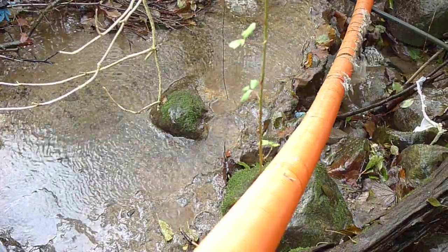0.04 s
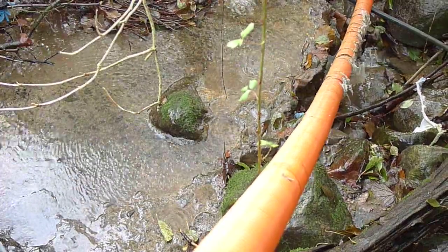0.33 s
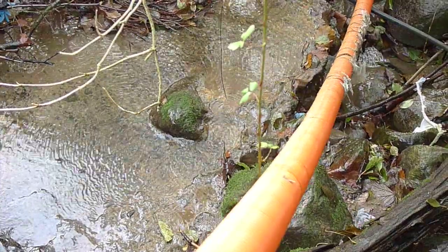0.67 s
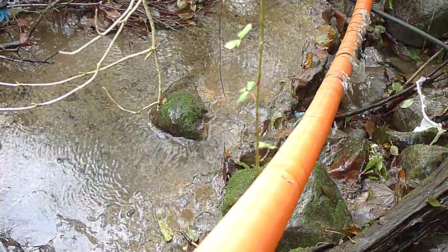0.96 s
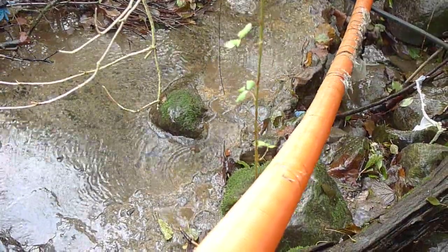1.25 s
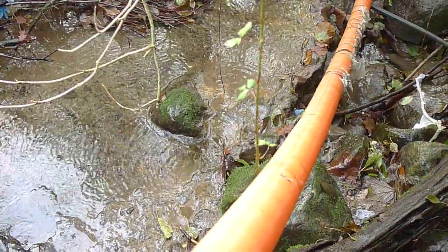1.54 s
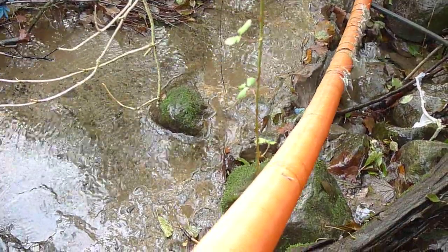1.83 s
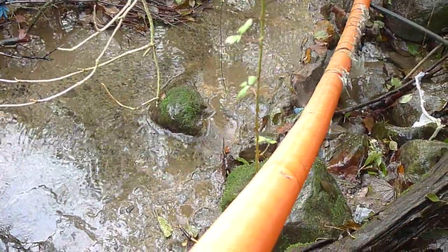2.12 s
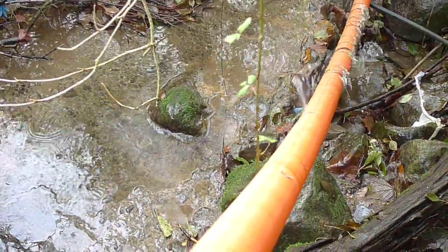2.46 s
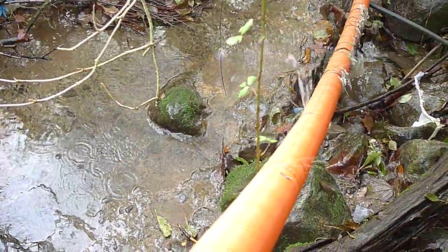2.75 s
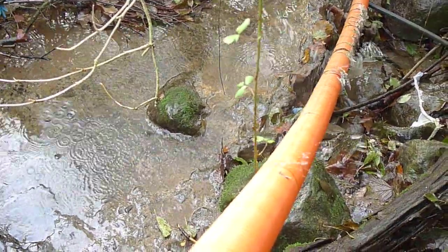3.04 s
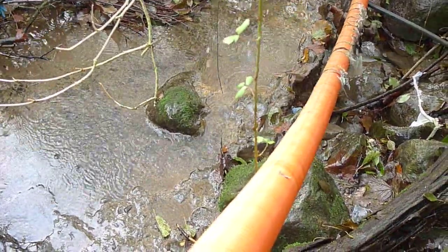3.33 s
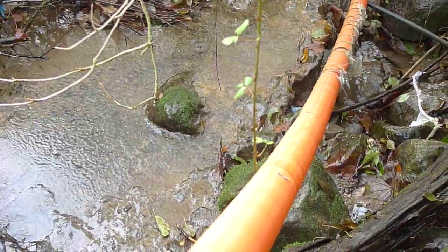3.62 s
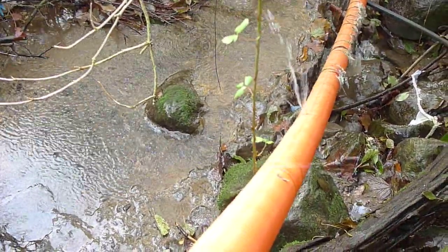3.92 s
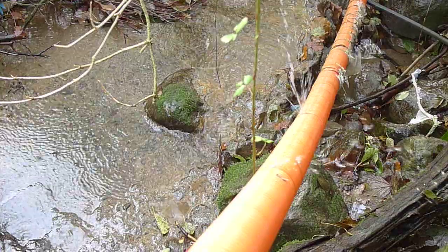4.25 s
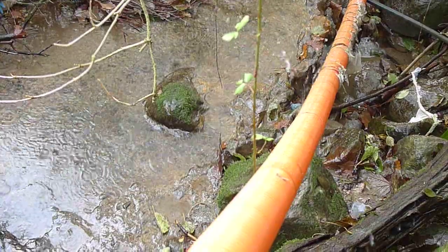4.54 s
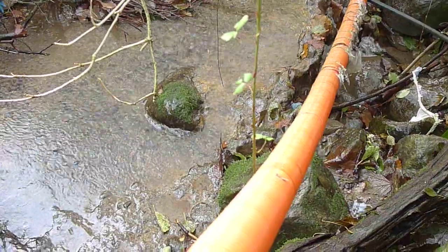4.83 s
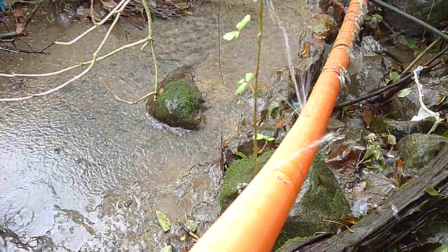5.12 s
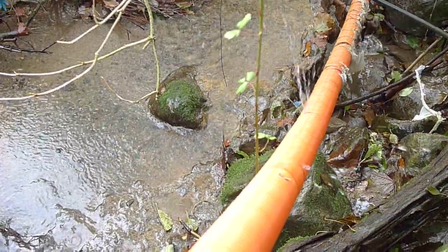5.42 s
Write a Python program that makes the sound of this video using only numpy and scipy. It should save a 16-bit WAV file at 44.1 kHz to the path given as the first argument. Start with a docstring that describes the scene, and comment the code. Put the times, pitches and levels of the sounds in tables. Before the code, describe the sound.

Air and water squeak and hiss in short spurts from a cracked hose, while spray patters and drops plink into a shallow running stream.

```python
"""A leaking hose above a shallow stream, heard close by through a small, dull microphone.
The stream runs and gurgles throughout, and spray patters on it. In the first second, air forced through
the wet crack whistles on a falling pitch and squeaks; drops begin to plink. The whistle ends in a faint
spurt. From about 2 s, air and water sputter out together in shrill spurts among gushes of spray.
Near 5 s the spurts die out and drops smack on stone and leaves."""
import sys
import numpy as np
from scipy import signal
from scipy.fft import rfft, irfft
from scipy.io import wavfile

SR = 44100
rng = np.random.default_rng(int(sys.argv[2]) if len(sys.argv) > 2 else 0)


def bounce(signal):
    """Save signal as a 16-bit WAV file at the path given by the first command-line argument."""
    frames = np.transpose(np.atleast_2d(signal))
    limited = np.clip(frames, -1, 1)
    pcm = np.round(limited * 32767).astype(np.int16)
    wavfile.write(sys.argv[1], SR, pcm)


N = 250488
TIME = np.arange(N) / SR


def gain_of(db):
    """Decibels to amplitude."""
    return 10 ** (np.asarray(db) / 20)


def unit_rms(x):
    """Scales to rms 1."""
    return x / np.sqrt(np.mean(x ** 2) + 1e-20)


def coloured(x, spectrum):
    """Filters x by a (frequency [Hz], gain [dB]) curve; rms 1."""
    hz, db = np.transpose(spectrum)
    curve_db = np.interp(np.log(np.fft.rfftfreq(N, 1 / SR) + 1), np.log(hz), db)
    return unit_rms(irfft(rfft(x) * gain_of(curve_db), N))


def wander(rate_hz):
    """Smooth random motion up to about rate_hz; rms 1."""
    lowpass = np.exp(-.5 * (np.fft.rfftfreq(N, 1 / SR) / rate_hz) ** 2)
    return unit_rms(irfft(rfft(rng.standard_normal(N)) * lowpass, N))


def resonate(x, hz, width_hz, order=2):
    """Resonance at a steady or moving pitch, cascaded for steep skirts."""
    carrier = np.exp(2j * np.pi * np.cumsum(hz * np.ones(len(x))) / SR)
    pole = np.exp(-np.pi * width_hz / SR)
    baseband = x / carrier
    for _ in range(order):
        baseband = signal.lfilter([1 - pole], [1, -pole], baseband + 1e-18)
    return (carrier * baseband).real


def add(mix, start_s, sound):
    """Mixes a sound in at start_s."""
    part = mix[max(round(start_s * SR), 0):][:len(sound)]
    part += sound[:len(part)]


def burst(start_s, hold_s, db, attack_s, release_s, db_per_s=0):
    """Envelope: builds until start_s, holds on a dB slope, dies away."""
    t = TIME - start_s
    edges = np.minimum(t, 0) / attack_s - np.maximum(t - hold_s, 0) / release_s
    return gain_of(db + db_per_s * np.clip(t, 0, hold_s)) * np.exp(np.maximum(edges, -20))


def impacts(per_s, spread_db):
    """Random clicks, mostly small, a few large."""
    size = gain_of(spread_db * np.minimum(rng.exponential(1, N), 4))
    return size * rng.choice([-1, 1], N) * (rng.random(N) < per_s / SR)


def bubble(hz, rise_cycles, ring_cycles, glide):
    """A trapped bubble swells, rings down and rises in pitch as it nears the surface."""
    cycles = hz * np.arange(SR // 16) / SR
    envelope = (1 - np.exp(-(cycles / rise_cycles) ** 2)) * np.exp(-cycles / ring_cycles)
    return envelope / envelope.max() * np.sin(2 * np.pi * cycles * (1 + glide * cycles))


# Stream spectrum: (frequency [Hz], gain [dB])
STREAM_SPECTRUM = [(25, -29), (60, -11), (110, -6.5), (185, 0), (350, -3.5), (540, 0), (1050, -3.5),
                   (1700, -2.5), (2600, -6), (3500, -5.5), (4200, -17.5), (5000, -26.5), (6000, -37.5),
                   (9000, -66.5)]


def stream(level_db=-43.5, bubble_db=-3, splash_db=-8, swell_db=0.5):
    """Running water: a smooth wash, many small bubbles and tiny splashes."""
    bubbles = np.zeros(N)
    for hz in np.geomspace(350, 3800, 22):
        births = impacts(per_s=26, spread_db=4.5)
        ring = bubble(hz, rise_cycles=0.56, ring_cycles=6.7, glide=0.006)
        bubbles += unit_rms(signal.oaconvolve(births, ring)[:N]) * np.sqrt(hz)
    wash = rng.standard_normal(N)
    splashes = gain_of(splash_db) * unit_rms(impacts(per_s=350, spread_db=6))
    water = coloured(wash + splashes, STREAM_SPECTRUM)
    water += gain_of(bubble_db) * coloured(bubbles, STREAM_SPECTRUM)
    return gain_of(level_db + swell_db * wander(5.6)) * unit_rms(water)


# Spray spectrum: (frequency [Hz], gain [dB])
SPRAY_SPECTRUM = [(40, -37.5), (100, -23.5), (180, -4), (330, -8), (520, -2), (1100, -0.5), (2000, -1.5),
                  (3000, 1.5), (3700, -1), (4400, -10.5), (5100, -20.5), (6000, -27), (9000, -61)]
# Gushes of spray: (time [s], hold [s], level [dB])
SPRAY_GUSHES = [(0.03, 0.62, -50), (1.77, 0.42, -40), (2.297, .22, -42), (2.618, 0.26, -48),
                (2.996, 0.032, -37.5), (3.659, 0.12, -39.5), (3.819, 0.058, -35), (3.961, 0.08, -40),
                (4.495, 0.043, -45.5), (4.7, 0.26, -53.5), (4.995, 0.027, -42.5), (5.112, 0.028, -42),
                (5.393, 0.034, -55)]


def spray(drizzle_db=-52, mist_db=-3, clump_db=1.8, spit_db=-9):
    """Droplets and heavier spits land in clumps on water and leaves: gushes over a steady drizzle."""
    gushes = sum(burst(*row, attack_s=0.03, release_s=0.035) for row in SPRAY_GUSHES)
    flow = gain_of(drizzle_db) + gushes
    droplets = unit_rms(impacts(per_s=2600, spread_db=1)) + gain_of(mist_db) * rng.standard_normal(N)
    spit_decay = np.exp(-np.arange(SR // 100) / (0.00072 * SR))
    spits = signal.oaconvolve(impacts(per_s=90, spread_db=4), spit_decay)[:N] * rng.standard_normal(N)
    patter = coloured(droplets + gain_of(spit_db) * unit_rms(spits), SPRAY_SPECTRUM)
    return flow * gain_of(clump_db * wander(21)) * patter


# Low gurgles: (peak time [s], level [dB], centre [Hz], Gaussian sigma [s])
LOW_GURGLES = [(0.111, -39.5, 297, 0.024), (0.117, -42.5, 600, 0.039), (0.25, -43, 540, .018),
               (.27, -48, 240, 0.056), (0.424, -46, 230, 0.015), (0.659, -47, 290, 0.051),
               (1.756, -38, 474, .016), (2.473, -47.5, 508, 0.058), (3.637, -50, 220, .1),
               (3.786, -42.5, 620, .025), (3.96, -39.5, 620, 0.021), (5.556, -54.5, 190, .1)]


def gurgles():
    """Clusters of large bubbles, each a swell of low noise."""
    out = np.zeros(N)
    for peak_s, db, hz, sigma_s in LOW_GURGLES:
        envelope = gain_of(db) * np.exp(-.5 * ((TIME - peak_s) / sigma_s) ** 2)
        out += envelope * unit_rms(resonate(rng.standard_normal(N), hz, width_hz=0.8 * hz, order=3))
    return out


# First mode of the crack: (time [s], pitch [Hz])
CRACK_PITCH = [(.1, 1560), (.3, 1678), (.35, 1642), (.5, 1573), (.56, 1528), (.68, 1502), (.8, 1410),
               (.87, 1410), (1.06, 1326)]
# Jet locks into a tone: (time [s], hold [s], level [dB], attack [s], release [s])
JET_LOCKS = [(0.346, .058, -18, 0.0094, .008), (0.468, .14, -18.5, 0.014, 0.042),
             (0.775, 0.023, -23, 0.013, 0.013), (0.824, 0.036, -29, 0.013, 0.02)]
# Locked tone: (harmonic [number], level [dB])
LOCK_HARMONICS = [(1, 4.5), (2, -19.5), (3, -46)]


def whistle(first_s=.19, third_s=0.7, end_s=1.056, jitter=0.0044, flutter_db=4.5, haze_db=-4):
    """The air jet rings the crack's first and third modes, and turns into a clean tone when it locks."""
    hz = np.interp(TIME, *np.transpose(CRACK_PITCH))
    phase = 2 * np.pi * np.cumsum(hz * (1 + jitter * wander(60))) / SR
    lock = sum(burst(*row, db_per_s=-48) for row in JET_LOCKS)
    tone = unit_rms(sum(gain_of(db) * np.sin(k * phase) for k, db in LOCK_HARMONICS))
    shimmer = gain_of(-0.64 * wander(70))

    first_gain = burst(first_s, end_s - first_s, db=-38, attack_s=0.056, release_s=.012, db_per_s=-7.5)
    first_mode = unit_rms(resonate(rng.standard_normal(N), hz, width_hz=173))

    third_gain = burst(third_s, end_s - third_s, db=-43.5, attack_s=0.21, release_s=.012)
    third_gain *= 1 + 4 * lock
    thin_tone = unit_rms(np.sin(3 * phase + 0.31 * wander(40)) * gain_of(flutter_db * wander(72)))
    haze = unit_rms(resonate(rng.standard_normal(N), 3 * hz, width_hz=700, order=3))
    third_mode = unit_rms(thin_tone + gain_of(haze_db) * haze)
    return lock * shimmer * tone + first_gain * first_mode + third_gain * third_mode


# Squeaks: (peak time [s], level [dB], pitch [Hz], rise [s], fall [s], glide [Hz/s])
CRACK_SQUEAKS = [(.216, -30, 1524, .005, 0.025, 2460), (.27, -27, 1650, .003, .0042, 1980),
                 (.299, -23, 1720, .003, 0.0031, 1980), (0.767, -31.5, 4340, 0.019, 0.018, -2800),
                 (2.373, -14, 3247, 0.017, 0.0047, 6000), (2.636, -21, 2270, 0.002, 0.013, 9100),
                 (3.797, -17.5, 2630, 0.005, .004, 5000)]


def squeaks(waver_db=1.2):
    """The crack locks into short tones that build up and are choked by water."""
    out = np.zeros(N)
    for peak_s, db, hz, rise_s, fall_s, hz_per_s in CRACK_SQUEAKS:
        t = TIME - peak_s
        envelope = gain_of(db) * np.exp(-(t / np.where(t < 0, rise_s, fall_s)) ** 2)
        out += envelope * np.sin(2 * np.pi * t * (hz + hz_per_s * t / 2))
    return out * gain_of(waver_db * wander(130))


# Drops on water: (time [s], plink peak [dB], pitch [Hz], decay [cycles])
DROP_PLINKS = [(0.802, -32.5, 893, 2.3), (.918, -35, 1040, 3), (1.071, -27, 975, 3.6),
               (1.187, -39, 1220, 2.4), (1.205, -35.5, 787, 12), (1.272, -32, 1260, 2.5),
               (1.501, -27, 984, 3.5), (1.606, -33, 950, 4.1), (1.919, -32, 1026, 3.2),
               (2.237, -31.5, 915, 2.4), (2.486, -30.5, 700, 1.4), (2.687, -34, 1130, 7.3),
               (2.894, -30, 810, 3.3), (2.925, -33.5, 980, 3.5), (3.312, -33.5, 1030, 2.4),
               (3.392, -26, 970, 1.1), (3.459, -35, 1380, 2.3), (3.539, -27, 956, 3),
               (3.588, -31, 714, 1.3), (4.81, -32, 979, 2.4), (4.877, -29, 950, 2.1),
               (5.179, -37.5, 626, 12), (5.476, -27.5, 1118, 9.2), (5.627, -36, 1010, 2)]
# Drops on stone and leaves: (time [s], peak [dB], centre [Hz])
DROP_SMACKS = [(1.25, -26, 1900), (1.273, -34, 3000), (1.303, -30.5, 1600), (4.724, -24.5, 3000),
               (4.987, -25.5, 2910), (5.104, -25.5, 3600), (5.169, -32, 3230), (5.259, -30.5, 3270),
               (5.394, -25, 3180), (5.433, -29, 2980), (5.627, -36, 2000)]


def drips(lead_s=0.0011, splash_db=-7, splash_s=0.02, smack_s=0.0016):
    """Drops splash and trap a ringing bubble in the water, or smack dryly on the bank."""
    out, t = np.zeros(N), np.arange(SR // 16) / SR
    for time_s, db, hz, ring_cycles in DROP_PLINKS:
        plink = bubble(hz, rise_cycles=2.46, ring_cycles=ring_cycles, glide=0.0021)
        impact = rng.standard_normal(len(t)) * np.exp(-t / splash_s)
        splash = resonate(impact, 1.01 * hz, width_hz=800)
        splash *= gain_of(splash_db) / abs(splash).max()
        add(out, time_s - lead_s, gain_of(db) * (plink + splash))
    for time_s, db, hz in DROP_SMACKS:
        impact = rng.standard_normal(len(t)) * np.exp(-t / smack_s)
        smack = resonate(impact, hz, width_hz=2000, order=5)
        add(out, time_s, gain_of(db) * smack / abs(smack).max())
    return out


# Spurts of air and water:
# (time [s], hold [s], level [dB], swell [dB/s], resonance [Hz], sag [Hz/s], width [Hz])
JET_SPURTS = [ (.94, .11, -46.5, 40, 3998, 1900.5, 561), (2.19, .125, -36, 5, 3640, 2401, 541.9),
              (2.389, 0.12, -32, 55, 3228, 3997.5, 660.7), (2.54, 0.066, -27, -45.5, 2498, 3000.5, 320.6),
              (2.631, 0.021, -29.5, -0.5, 2428, -2, 358.2), (3.587, .185, -32, 11.5, 3370, 1050, 620.3),
              (3.804, .078, -29, 27, 2871, 700, 1199), (4.04, .09, -43.5, 0, 3802, 3500, 1151),
              (4.19, .09, -47.5, 0, 2822, 7000.5, 499), (4.383, 0.045, -48, 1.5, 1730, 1499, 395),
              (4.74, 0.21, -51, 14, 3628, 1599.5, 519), (4.895, 0.0092, -32.5, -0.5, 3119, -4, 620.4)]


def jet(widen_per_s=3.3):
    """Jet strength, resonance and width: the resonance sags and widens as water fills the crack."""
    start_s, hold_s, db, db_per_s, start_hz, sag_hz_per_s, width_hz = np.transpose(JET_SPURTS)[..., None]
    power = burst(start_s, hold_s, db, attack_s=.018, release_s=.01, db_per_s=db_per_s) ** 2
    share = power / power.sum(0)
    age_s = np.clip(TIME - start_s, 0, hold_s)
    sagged_hz = start_hz - sag_hz_per_s * age_s
    widened_hz = width_hz * (1 + widen_per_s * age_s)
    return np.sqrt(power.sum(0)), (share * sagged_hz).sum(0), (share * widened_hz).sum(0)


def spurts(slug_hz=105, unevenness=0.402, chop_db=4.5, flicker_db=1.5, hiss_db=-8, saturation=0.47):
    """Slugs of water chop the jet into puffs that ring the crack's resonance, over a broad hiss."""
    strength, hz, width_hz = jet()
    slug_phase = 2 * np.pi * np.cumsum(slug_hz * (1 + unevenness * wander(58.18))) / SR
    puffs = unit_rms(gain_of(chop_db * np.sin(slug_phase) + flicker_db * wander(80)))
    # A wider resonance drifts faster in amplitude and phase.
    clock = np.cumsum(width_hz) / width_hz.max()
    drift_hz = width_hz.max() / np.pi
    ring = np.interp(clock, np.arange(N), wander(drift_hz) + 1j * wander(drift_hz))
    ring /= np.sqrt(1 + np.abs(saturation * ring) ** 2)  # limited jet drive
    shrill = unit_rms((ring * np.exp(2j * np.pi * np.cumsum(hz) / SR)).real)
    hiss = unit_rms(resonate(rng.standard_normal(N), hz=3150, width_hz=2500, order=5))
    return strength * puffs * (shrill + gain_of(hiss_db) * hiss)


def bank_echoes(x, t60_s, wet_db, echoes_per_s=2000):
    """Adds brief scattered echoes from the water, rocks and banks."""
    t = np.arange(SR // 3) / SR
    taps = rng.standard_normal(len(t)) * (rng.random(len(t)) < echoes_per_s / SR)
    taps *= (t > .004) * gain_of(-60 * t / t60_s)
    return x + gain_of(wet_db) * signal.oaconvolve(x, taps / np.linalg.norm(taps))[:N]


def scene():
    """The leak close by, the drops and the stream below; mono."""
    leak = bank_echoes(whistle() + squeaks() + spurts(), t60_s=0.25, wet_db=-20.5)
    drops = bank_echoes(drips(), t60_s=0.084, wet_db=-9)
    return (leak + drops + spray() + gurgles() + stream())[None]


def record(dry, treble_hz=5500, knee=0.14, thump_db=2, hiss_db=-62.5, edge_hz=8050, dc_offset=-0.0051):
    """Dull microphone with one-sided overload, then recorder hiss, band limit and DC offset."""
    dull = signal.sosfilt(signal.butter(8, treble_hz, fs=SR, output="sos"), dry)
    # Peaks over the knee shift the bias, which recovers with a soft thump.
    overload = np.maximum(dull - knee, 0)
    thump = signal.sosfilt(signal.butter(1, [18, 70], "bandpass", fs=SR, output="sos"), overload)
    noisy = dull - gain_of(thump_db) * thump + gain_of(hiss_db) * rng.standard_normal(dry.shape)
    band_limit = signal.firwin(221, edge_hz, window=("kaiser", 8), fs=SR)
    return signal.oaconvolve(noisy, band_limit[None], "same") + dc_offset


dry = scene()
out = record(dry)
bounce(out)
```